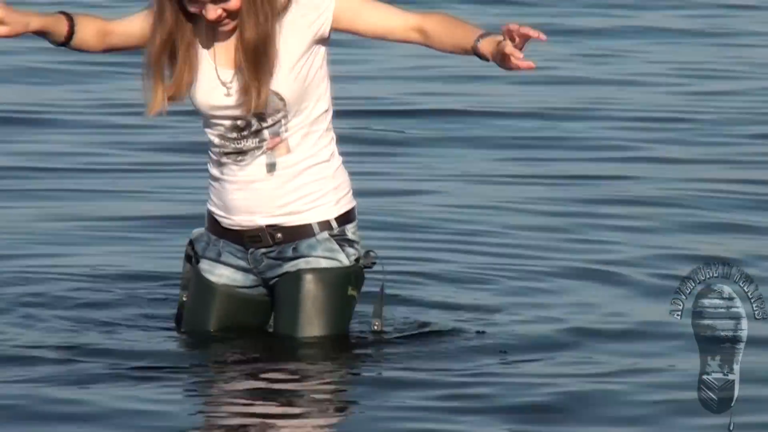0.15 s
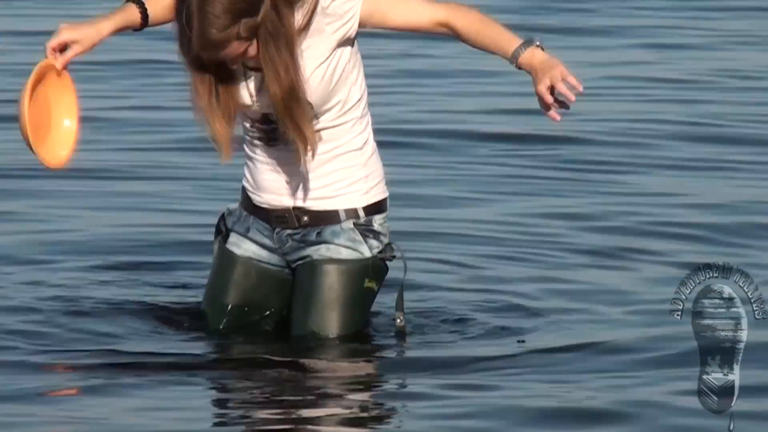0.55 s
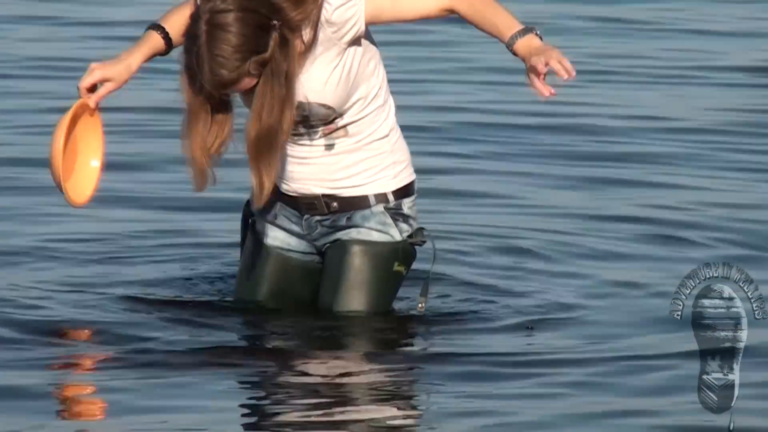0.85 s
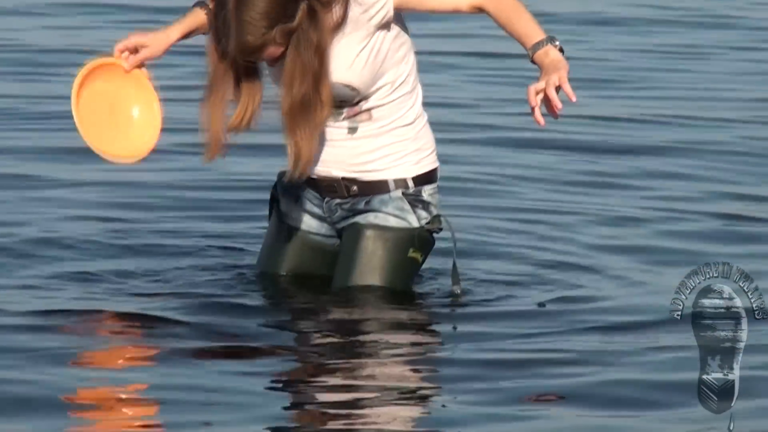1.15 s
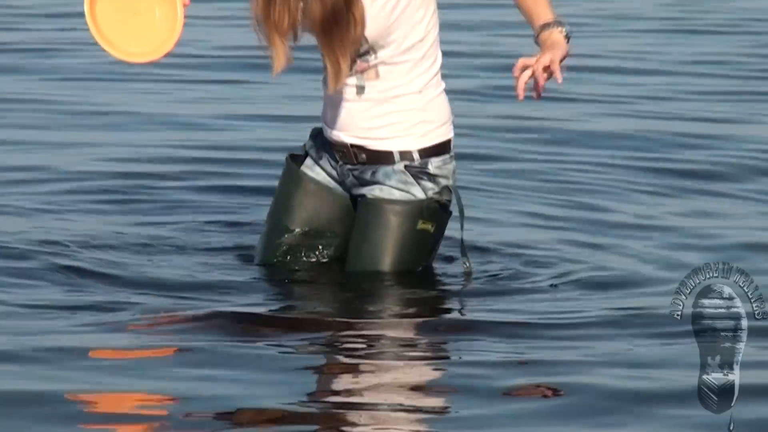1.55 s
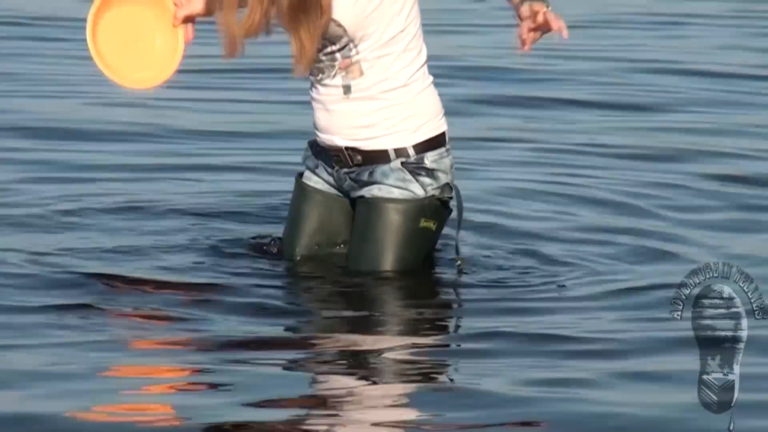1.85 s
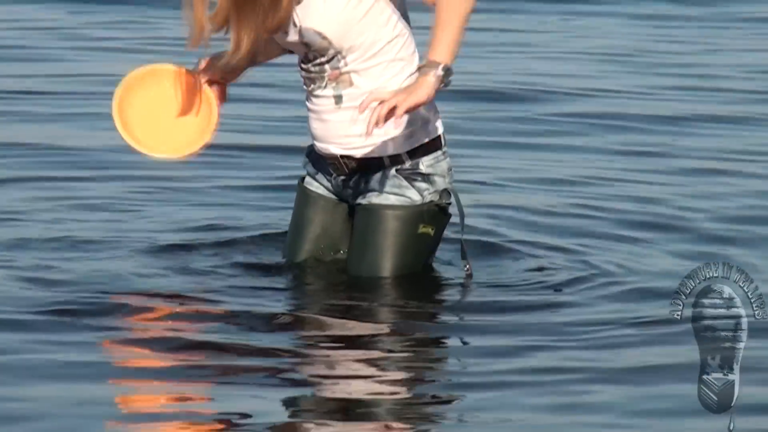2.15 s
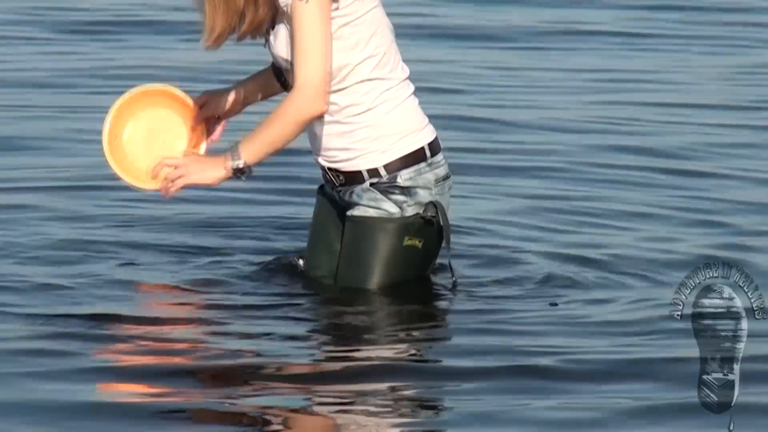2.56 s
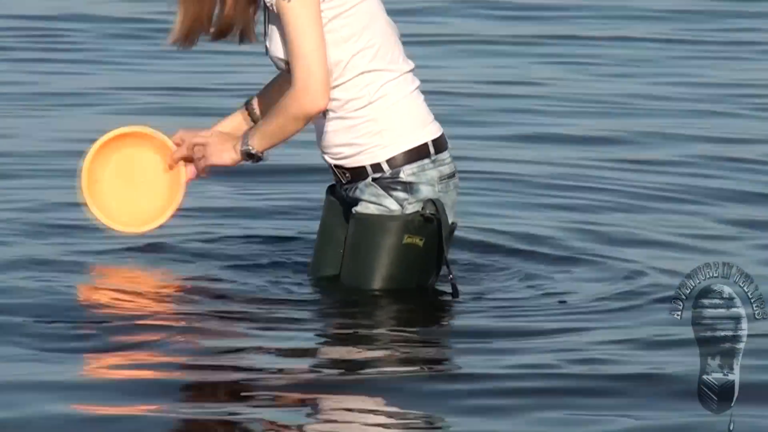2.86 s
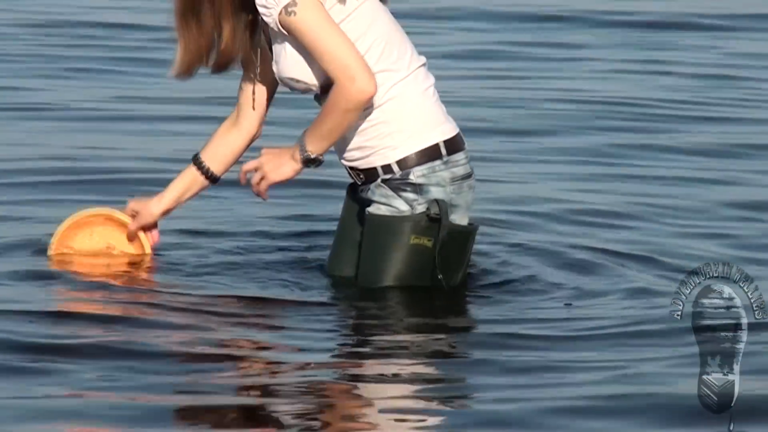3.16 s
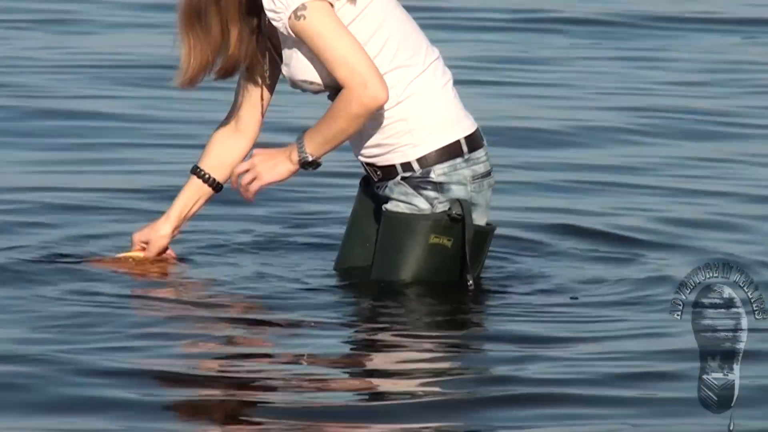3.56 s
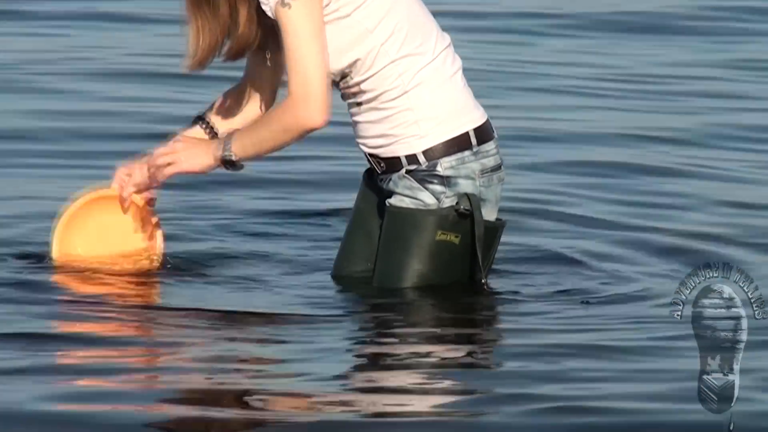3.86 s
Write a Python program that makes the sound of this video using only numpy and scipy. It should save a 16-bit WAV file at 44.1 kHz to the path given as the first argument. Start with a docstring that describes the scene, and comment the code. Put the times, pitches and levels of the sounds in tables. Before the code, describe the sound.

Water sloshing softly with small plops as someone wades, over low wind rumble and hiss.

```python
"""A calm lake: someone in rubber waders takes slow steps, then dips a plastic basin.
The stirred water traps air: single bubbles ring and glide, mostly upward, and one large pocket gulps,
over a patter of small bubbles, slaps of spray and a soft wash. The waders rub briefly,
wind buffets the microphone, and the recorder hisses with a faint high whine."""
import sys
import numpy as np
from scipy import signal
from scipy.io import wavfile

SR = 44100
rng = np.random.default_rng(int(sys.argv[2]) if len(sys.argv) > 2 else 0)


def persist_wave(psi):
    """Save psi, clipped to +-1, as 16-bit WAV."""
    counts = np.round(np.clip(psi, -1, 1) * 32767).astype(np.int16)
    wavfile.write(sys.argv[1], SR, np.atleast_2d(counts).T)


N = 176400
TIME = np.arange(N) / SR
CUTOFF_HZ = 15750


def from_db(db):
    """Decibels to gain."""
    return 10 ** (np.asarray(db) / 20)


def unit_rms(x):
    """Scale to rms 1."""
    return x / np.sqrt(np.mean(x ** 2) + 1e-20)


def curves(rows):
    """Interpolate each level column over time, per sample."""
    times_s, *columns = np.transpose(rows)
    return [np.interp(TIME, times_s, column) for column in columns]


def db_at(spectrum, hz):
    """Read a spectrum on a log-frequency axis."""
    points_hz, levels_db = np.transpose(spectrum)
    return np.interp(np.log(hz), np.log(points_hz), levels_db)


def add(out, start_s, sound):
    """Mix a sound in at start_s."""
    i = int(np.clip(start_s * SR, 0, N - 1))
    out[i:i + len(sound)] += sound[:N - i]


def drift(corner_hz):
    """Smooth random curve, rms 1."""
    hop, settle = 40, 2000
    pole = np.exp(-2 * np.pi * corner_hz * hop / SR)
    white = rng.standard_normal(N // hop + settle + 2)
    slow = signal.lfilter([1], [1, -2 * pole, pole ** 2], white)[settle:]
    return np.interp(np.arange(N) / hop, np.arange(len(slow)), unit_rms(slow))


# Stereo width of the noise: (frequency [Hz], side minus mid [dB])
STEREO_WIDTH = [(30, -43), (130, -33), (280, -12.5), (700, -29), (2800, -40), (9000, -10), (15000, -11)]
def banded_noise(spectrum, flicker_db=0, flicker_hz=14):
    """Stereo noise in narrow bands, each with its own level and flicker; rms 1."""
    low_hz, high_hz = spectrum[0][0], min(spectrum[-1][0], CUTOFF_HZ)
    edges_hz = 16500 / 2 ** (np.arange(26)[::-1] / 2.5)
    out, white = 0, rng.standard_normal((2, 2, N + SR // 4))
    for k, band in enumerate(zip(edges_hz, edges_hz[1:])):
        hz, flicker = np.sqrt(band[0] * band[1]), drift(flicker_hz)
        if low_hz <= hz <= high_hz:
            bandpass = signal.butter(3, band, "band", fs=SR, output="sos")
            mid, side = signal.sosfilt(bandpass, white[k % 2])[:, -N:]
            stereo = mid + from_db(db_at(STEREO_WIDTH, hz)) * side * [[1], [-1]]
            out = out + from_db(db_at(spectrum, hz) + flicker_db * flicker) * stereo
    return unit_rms(out)


# Air and recorder hiss: (frequency [Hz], relative density [dB])
HISS_SPECTRUM = [(120, 4), (250, -6.5), (450, -8.5), (700, -15.5), (1100, -14), (2300, -14.5), (5000, -15),
                 (9000, -16.5), (15500, -17)]
def hiss():
    """Steady noise of the open air and the recorder."""
    return from_db(-47) * banded_noise(HISS_SPECTRUM, flicker_db=0.45)


# Gust strength: (time [s], rumble level [dB], relative flutter level [dB])
GUST_LEVELS = [(0, -27, -48), (0.35, -24.5, -43), (0.6, -17.5, -38.5), (1.03, -20, -41),
               (1.2, -25.5, -45.5), (1.55, -31, -41), (2.05, -35.5, -45), (2.5, -33.5, -39),
               (2.78, -21, -38), (3.02, -14, -34), (3.27, -20, -25), (3.56, -10, -44), (3.72, -25, -33),
               (4, -18, -50)]
# Deep rumble and the flutter above it: (frequency [Hz], relative density [dB])
RUMBLE_SPECTRUM = [(14, -2), (26, 3.5), (45, -4.5), (60, -11), (80, -27)]
FLUTTER_SPECTRUM = [(65, 3), (100, -0.5), (135, -20), (200, -29), (320, -39)]
# Single pushes of air: (time [s], peak [dB])
AIR_PUSHES = [(2.787, -11), (3.593, -2)]
def wind(buffet_width_s=0.013):
    """Gusts on the microphone: lumpy rumble, flutter and sharp pressure pulses."""
    rumble_db, flutter_db = curves(GUST_LEVELS)
    rumble = from_db(rumble_db) * banded_noise(RUMBLE_SPECTRUM, flicker_db=2)
    flutter = from_db(flutter_db - 4) * banded_noise(FLUTTER_SPECTRUM, flicker_db=2)
    buffets = sum(from_db(db) * np.exp(-np.abs(TIME - s) / buffet_width_s) for s, db in AIR_PUSHES)
    return rumble + flutter - buffets


# Rubs of the waders: (time [s], level [dB])
WADER_RUBS = [(1.512, -38), (1.662, -44)]
# Rubber scuff: (frequency [Hz], relative density [dB])
SCUFF_SPECTRUM = [(1200, 4), (3700, -6), (6000, -14), (11000, -8)]
def waders(attack_s=0.012, decay_s=0.045, squeak_hz=3660, bandwidth_hz=550):
    """Rubber slides on rubber: a narrow squeaky resonance over a broad scuff."""
    envelope = sum(from_db(db) * np.exp(-np.maximum((s - TIME) / attack_s, (TIME - s) / decay_s))
                   for s, db in WADER_RUBS)
    resonance = signal.iirpeak(squeak_hz, squeak_hz / bandwidth_hz, fs=SR)
    squeak = unit_rms(signal.lfilter(*resonance, rng.standard_normal(N)))
    scuff = from_db(-12) * banded_noise(SCUFF_SPECTRUM)
    return envelope * (squeak + scuff)


def glide(start_hz, rise_oct_per_s, t):
    """Sine with a linear sweep; rise_oct_per_s is the initial slope."""
    pitch_hz = start_hz * (1 + np.log(2) * rise_oct_per_s * t)
    return np.sin(2 * np.pi * np.cumsum(pitch_hz) / SR)


def bubble(hz, ring_s, rise_oct_per_s, attack_cycles=0.44):
    """Trapped air rings and dies; its pitch climbs near the surface (negative rise: it falls)."""
    t = np.arange(int(6 * ring_s * SR) + 2) / SR
    attack = 1 - np.exp(-(t * hz / attack_cycles) ** 2)
    return attack * np.exp(-t / ring_s) * glide(hz, rise_oct_per_s, t)


def swarm(spectrum, per_s, ring_cycles, spread_db, rise_oct_per_ring):
    """Small bubbles with random onset, pitch, level, ring and rise; rms 1."""
    out, low_hz, high_hz = np.zeros(N), spectrum[0][0], spectrum[-1][0]
    for onset, pitch, faintness, ring, rise in rng.random((int(per_s * N / SR), 5)):
        hz = low_hz * (high_hz / low_hz) ** pitch
        ring_s = ring_cycles * 2 ** (2 * ring - 1) / hz
        db = db_at(spectrum, hz) - spread_db * np.log(faintness + 0.03)  # few loud, many faint
        rise_oct_per_s = 2 * rise * rise_oct_per_ring / ring_s
        add(out, onset * N / SR, from_db(db) * bubble(hz, ring_s, rise_oct_per_s))
    return unit_rms(out)


# Stirring strength: (time [s], relative gurgle level [dB], relative fizz level [dB])
STIR_LEVELS = [(0, -52.5, -57), (0.33, -57, -58), (0.48, -43.5, -50.5), (0.72, -54, -51.5),
               (0.8, -47.5, -46.5), (1.04, -46.5, -50.5), (1.16, -51.5, -53.5), (1.45, -55, -55),
               (1.95, -52.5, -56), (2.25, -47.5, -46.5), (2.52, -43, -45.5), (2.68, -48, -46.5),
               (2.82, -37, -45), (2.92, -45.5, -48), (3.12, -47.5, -45.5), (3.37, -40.5, -43),
               (3.48, -47.5, -48), (3.75, -53, -51), (4, -51.5, -52.5)]
# Bubble swarms: (pitch [Hz], relative level [dB])
GURGLE_SPECTRUM = [(300, -10.5), (450, -8), (700, 1), (1000, 0.5), (1300, -27)]
FIZZ_SPECTRUM = [(1100, -5), (1700, -3.5), (2600, -5), (3800, -3), (5000, -15), (8000, -13)]
# Wash of moving water: (frequency [Hz], relative density [dB])
WASH_SPECTRUM = [(150, 8), (280, -27), (450, 3.5), (750, 5), (1200, -2.5), (2000, -4.5), (3600, -4.5),
                 (5200, -24), (9000, -11.5), (15000, -27)]
def sloshing(swarm_gain_db=0.5, wash_gain_db=-4.5):
    """Low gurgle, fine fizz and soft wash follow the stirring of the water."""
    gurgle_db, fizz_db = curves(STIR_LEVELS)
    gurgle = swarm(GURGLE_SPECTRUM, per_s=400, ring_cycles=4.75, spread_db=2.5, rise_oct_per_ring=0.082)
    fizz = swarm(FIZZ_SPECTRUM, per_s=850, ring_cycles=5.8, spread_db=4, rise_oct_per_ring=0.022)
    swarms = from_db(gurgle_db) * gurgle + from_db(fizz_db) * fizz
    wash = from_db((gurgle_db + fizz_db) / 2) * banded_noise(WASH_SPECTRUM, flicker_db=2.5, flicker_hz=17)
    return from_db(swarm_gain_db) * swarms + from_db(wash_gain_db) * wash


# Slaps of spray: (time [s], centre [Hz], relative level [dB], decay [s])
SPRAY_SLAPS = [(.4645, 4020, -37.5, 0.0033), (0.564, 2200, -38.5, 0.0089), (0.8597, 2560, -36.5, .004),
               (.9264, 5000, -44, .003), (1.0249, 2140, -36, 0.003), (1.035, 2220, -33, .0064),
               (1.0745, 3870, -32, 0.001), (1.313, 2600, -38.5, 0.0044), (2.159, 5600, -47, 0.035),
               (2.367, 4280, -35.5, 0.0026), (2.5428, 1980, -30, .004), (2.737, 4050, -35.5, 0.0023),
               (2.7425, 6500, -41, 0.0027), (2.7575, 9000, -43, .002), (2.791, 1700, -31.5, 0.0024),
               (2.807, 2220, -41.5, 0.024), (2.809, 6050, -42, 0.0062), (2.822, 6500, -41, 0.0023),
               (3.114, 3420, -30.5, .0022), (3.1325, 3300, -33, .002), (3.157, 4300, -41, 0.0017),
               (3.171, 3460, -35, 0.0016), (3.344, 6000, -41, .002), (3.347, 1300, -49, 0.018),
               (3.3744, 2330, -33, 0.0027), (3.390, 5400, -34, 0.0019), (3.655, 6700, -37, 0.0022)]
def spray(gain_db=1, relative_bandwidth=0.53):
    """Spray slaps back on the surface: broad bursts that start at once and die."""
    out, t = np.zeros(N), TIME[:SR // 10]
    for start_s, hz, db, decay_s in SPRAY_SLAPS:
        b, a = signal.iirpeak(hz, 1 / relative_bandwidth, fs=SR)
        white = rng.standard_normal(len(t))
        burst = unit_rms(signal.lfilter(b, a, signal.lfilter(b, a, white)))
        add(out, start_s, from_db(db + gain_db) * burst * np.exp(-t / decay_s))
    return out


# Single bubbles: (time [s], start pitch [Hz], relative level [dB], ring [s], initial rise [oct/s])
SINGLE_BUBBLES = [ (.385, 828, -35, 0.013, 18.5), (.4643, 3500, -31.5, 0.0048, 3),
                  (.471, 826, -32, 0.012, -7), (.487, 782, -34.5, 0.012, -8), (.639, 350, -29, .0052, 12),
                  (.673, 346, -34.5, 0.0099, 13), (.778, 710, -36.5, .014, 13), (.795, 850, -37, 0.01, -18),
                  (.961, 536, -33, 0.014, 12.5), (1.0255, 2130, -18.5, 0.00077, 8),
                  (1.04, 1700, -31.5, 0.0031, 20), (1.046, 600, -29, 0.0018, -5),
                  (1.141, 3030, -40.5, .006, 1), (1.778, 400, -37, 0.011, -2.5),
                  (2.005, 718, -37.5, 0.014, 3.5), (2.227, 813, -35, 0.017, -9),
                  (2.308, 666, -37.5, 0.028, 3.5), (2.432, 1240, -33, 0.0084, 2),
                  (2.443, 840, -30, 0.0068, 4), (2.533, 1017, -23, 0.0037, 30),
                  (2.570, 495, -37.5, .041, 4), (2.602, 652, -34, 0.016, 36),
                  (2.743, 770, -29.5, 0.011, 8.5), (2.763, 379, -30.5, .012, 7),
                  (2.779, 487, -29, 0.007, 23), (2.806, 1120, -31, 0.016, 26),
                  (2.818, 1216, -20, 0.0018, 8), (2.963, 558, -34, .032, 12.5),
                  (3.0297, 3570, -28.5, 0.0016, -3), (3.101, 780, -29, .016, 1),
                  (3.115, 407, -31, 0.036, 13), (3.194, 4050, -40, .004, 7), (3.2955, 642, -22, 0.0073, 2),
                  (3.347, 653, -25, 0.0091, -0.5), (3.3595, 1483, -23.5, 0.0035, 6),
                  (3.368, 555, -31.5, .014, 2), (3.4525, 1507, -32.5, 0.0098, 26.5),
                  (3.601, 815, -35, 0.014, 3.5), (3.681, 1020, -39.5, .025, 28.5),
                  (3.7423, 530, -37, 0.015, -6.5), (3.798, 3480, -36, 0.0029, 23)]
def plops(gain_db=2.5):
    """Trapped bubbles that ring out singly above the swarms."""
    out = np.zeros(N)
    for start_s, hz, db, ring_s, rise_oct_per_s in SINGLE_BUBBLES:
        add(out, start_s, from_db(db + gain_db) * bubble(hz, ring_s, rise_oct_per_s))
    return out


def gulp(start_s=2.7892, level_db=-15.5, swell_s=0.0082, wobble_depth=0.23):
    """A leg pushes forward; a large air pocket wobbles as it closes, its pitch sweeping up."""
    out, t = np.zeros(N), TIME[:SR // 25]
    swell = (t / swell_s) ** 2
    envelope = from_db(level_db) * swell * np.exp(1 - swell)
    wobble = 1 + wobble_depth * drift(corner_hz=160)[:len(t)]
    add(out, start_s, envelope * wobble * glide(start_hz=338, rise_oct_per_s=103, t=t))
    return out


def scene():
    """Hiss and wind behind the waders and the stirred water."""
    return hiss() + wind() + waders() + sloshing() + spray() + plops() + gulp()


def record(dry, whine_hz=15625, carrier_rms_db=-62.5, flutter_hz=50, flutter_depth=1.1):
    """The recorder adds a thin fluttering whine and cuts the top."""
    flutter = 1 + flutter_depth * np.sin(2 * np.pi * flutter_hz * TIME)
    carrier = from_db(carrier_rms_db) * np.sqrt(2) * np.sin(2 * np.pi * whine_hz * TIME)
    lowpass = signal.ellip(12, 0.1, 70, CUTOFF_HZ, fs=SR, output="sos")
    return signal.sosfilt(lowpass, dry + flutter * carrier)


dry = scene()
out = record(dry)
persist_wave(out)
```